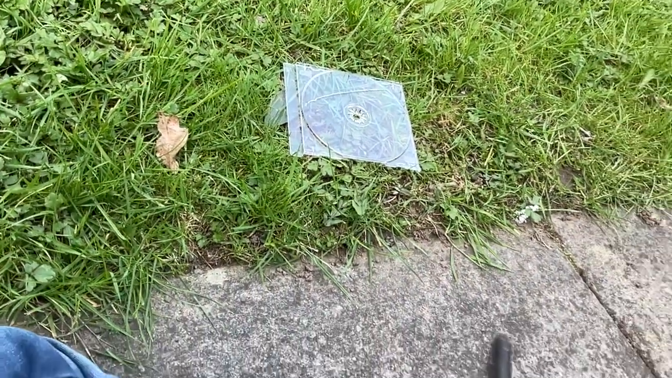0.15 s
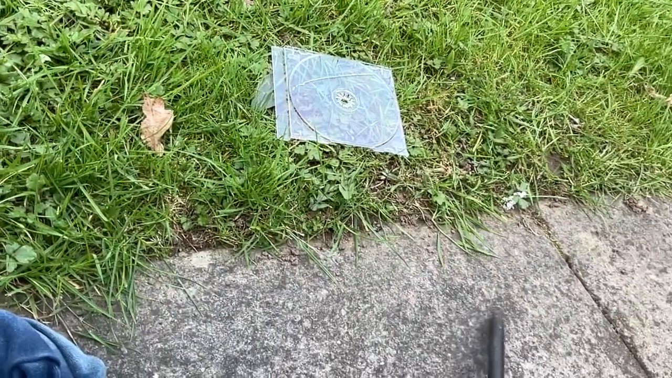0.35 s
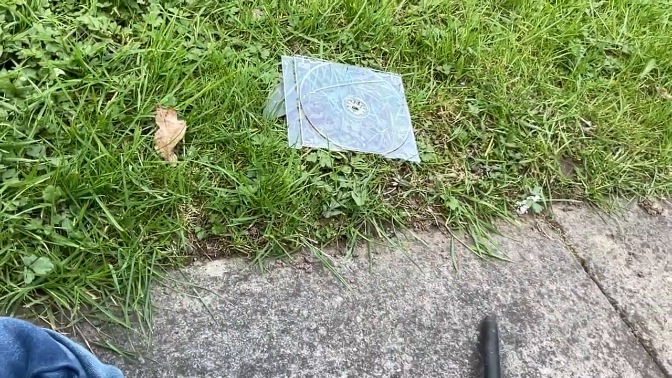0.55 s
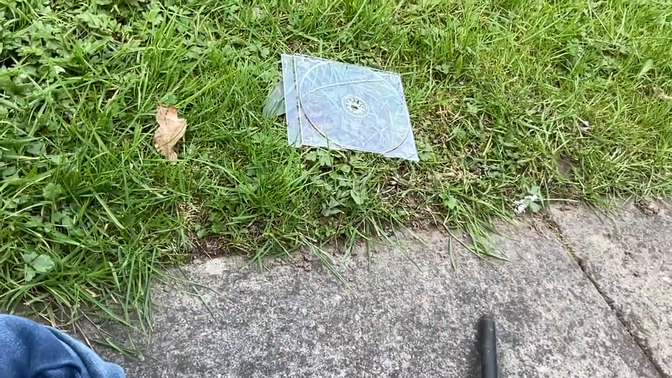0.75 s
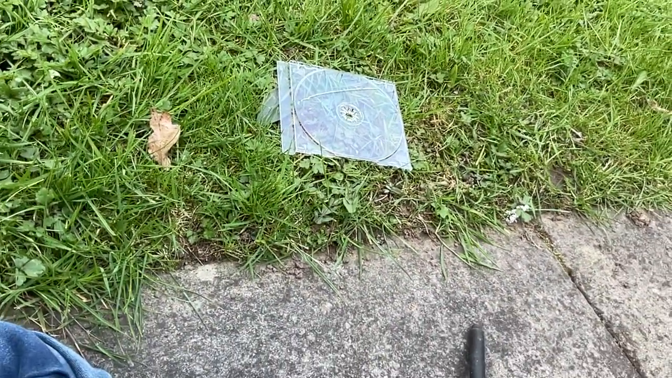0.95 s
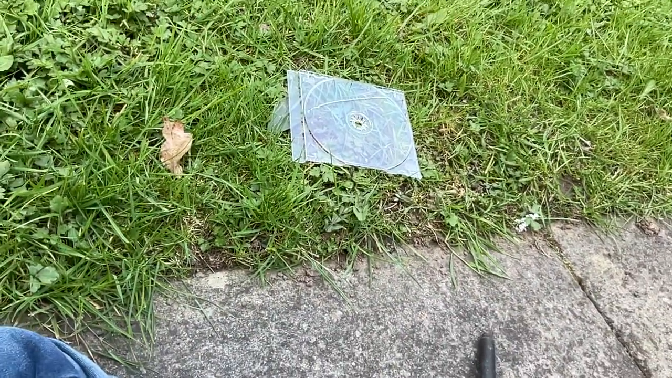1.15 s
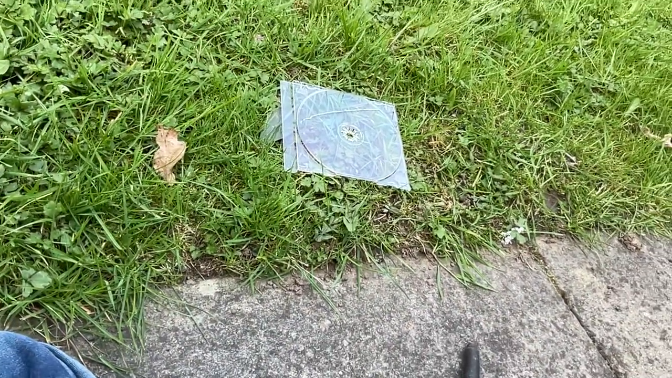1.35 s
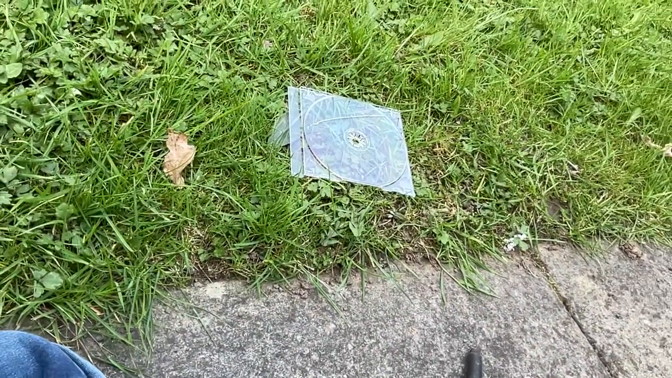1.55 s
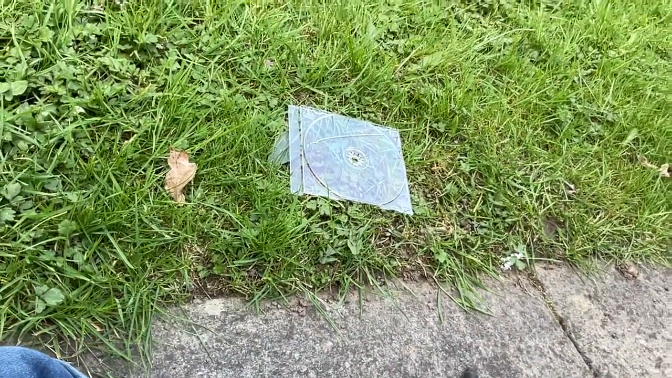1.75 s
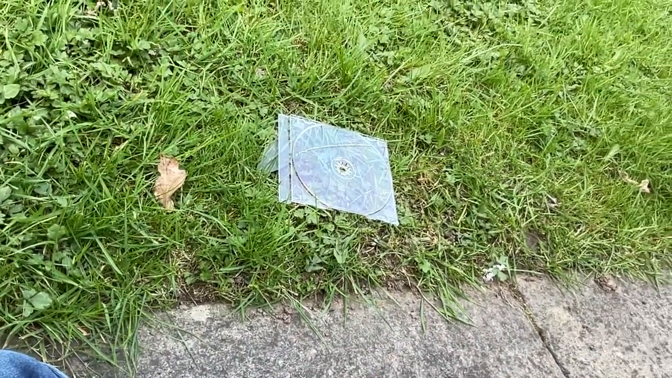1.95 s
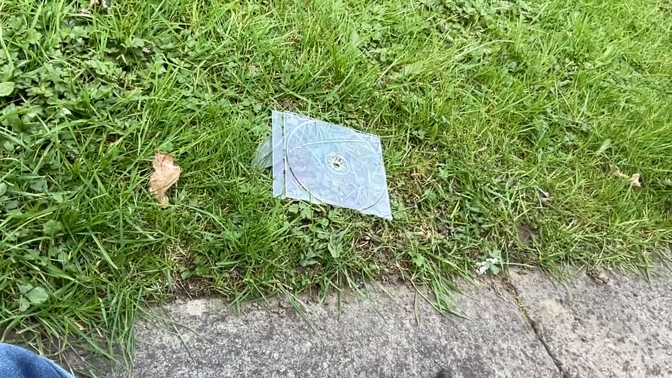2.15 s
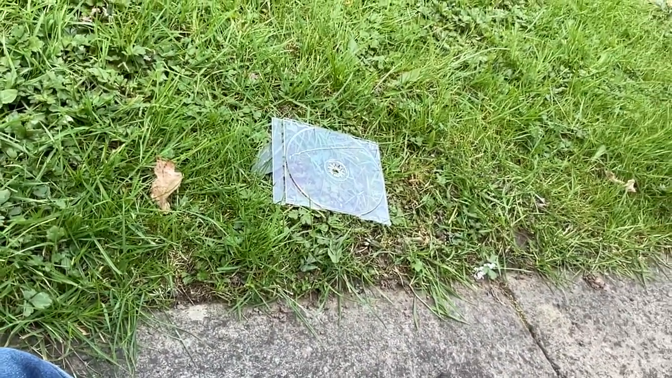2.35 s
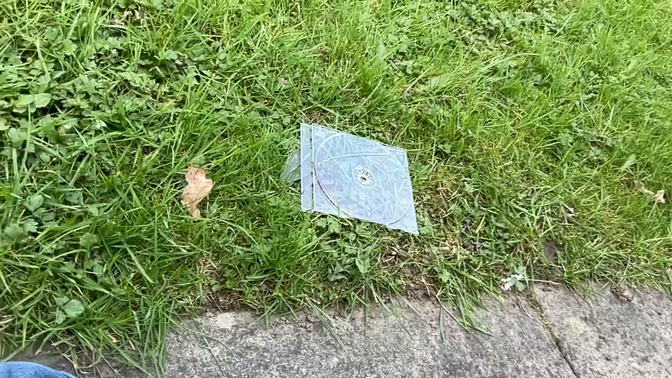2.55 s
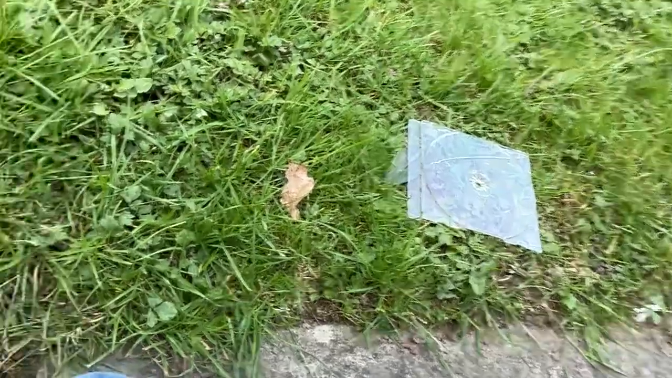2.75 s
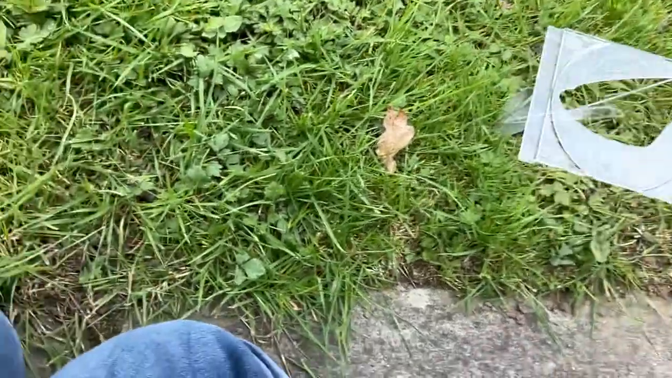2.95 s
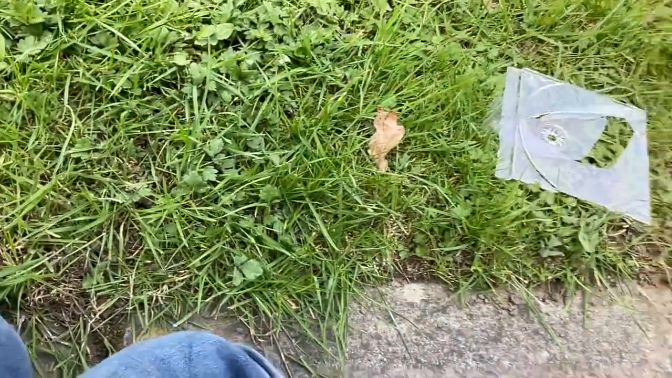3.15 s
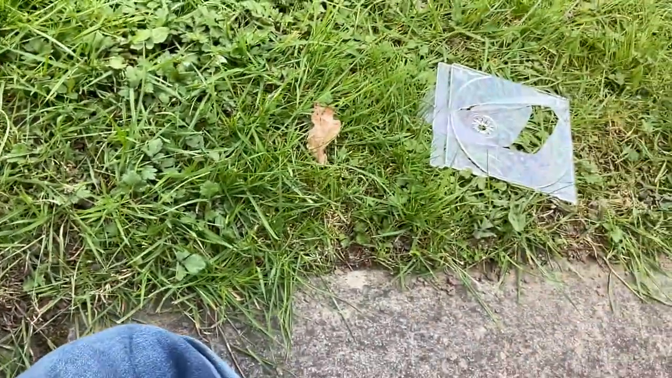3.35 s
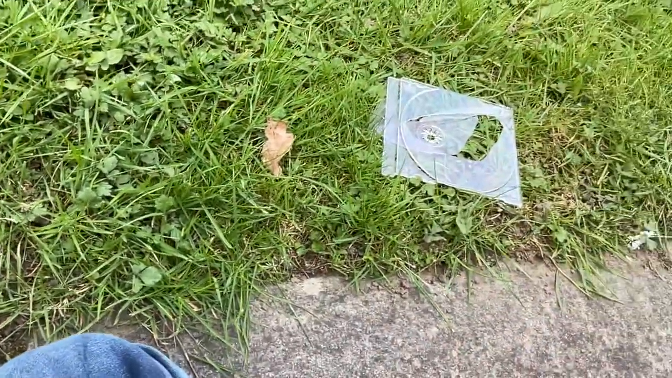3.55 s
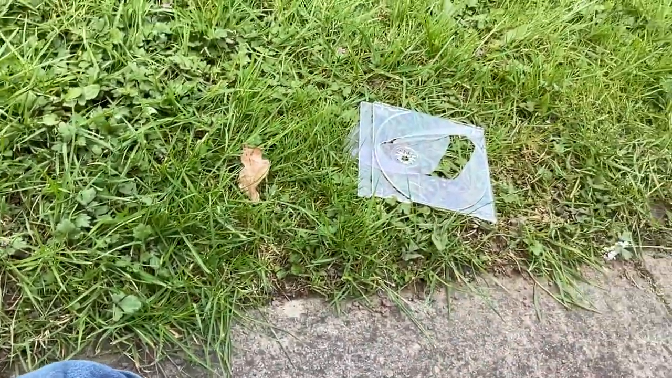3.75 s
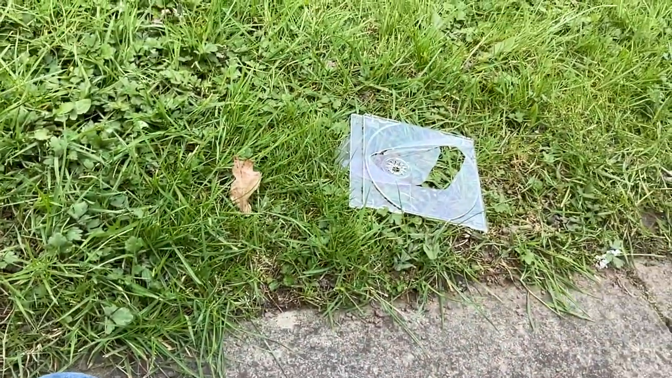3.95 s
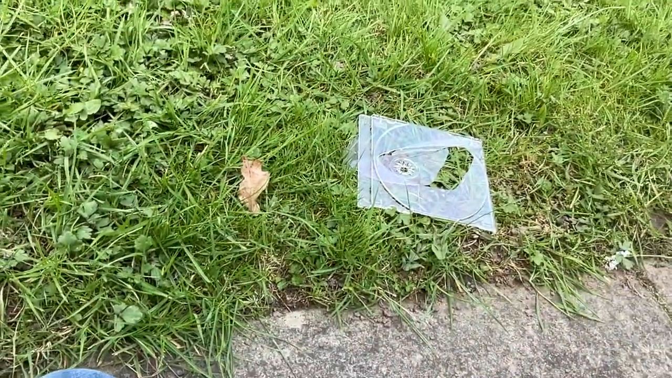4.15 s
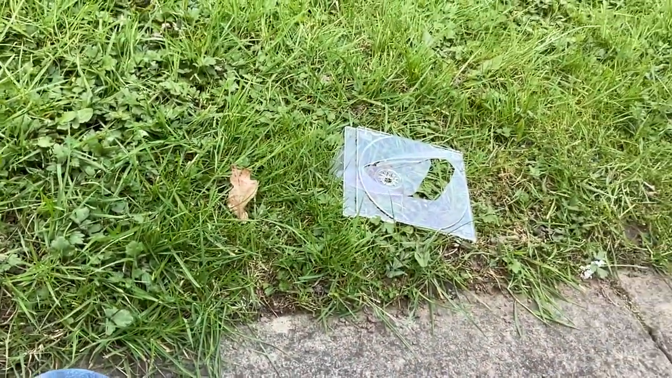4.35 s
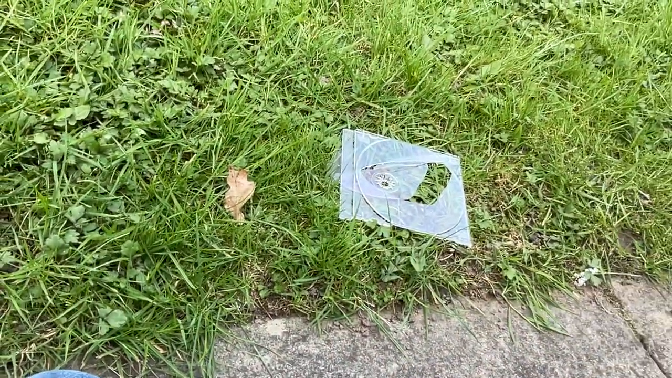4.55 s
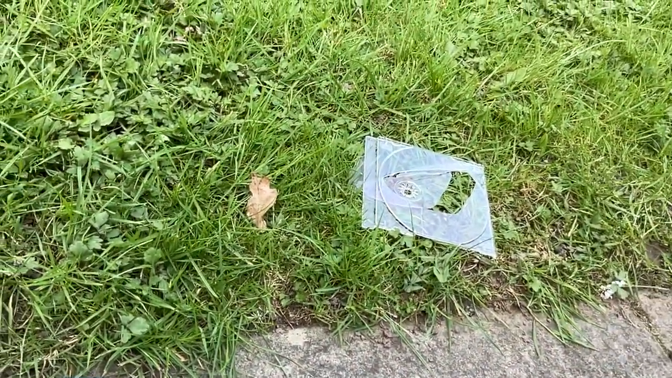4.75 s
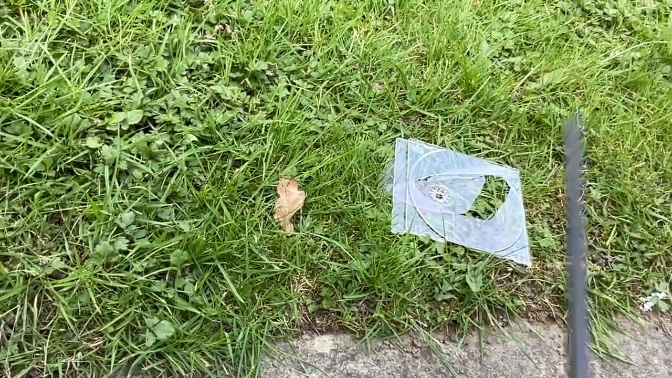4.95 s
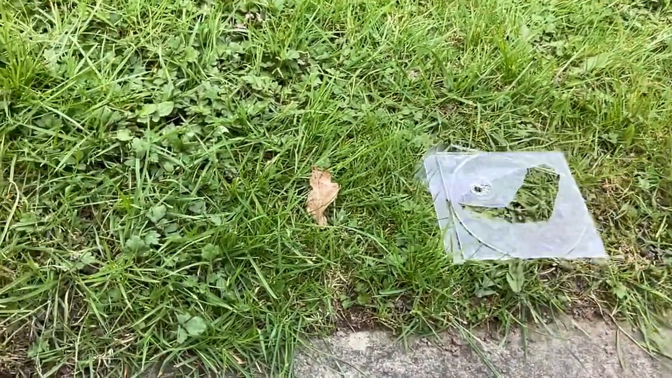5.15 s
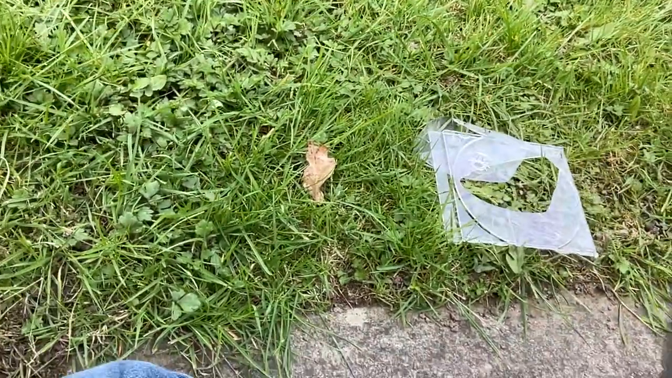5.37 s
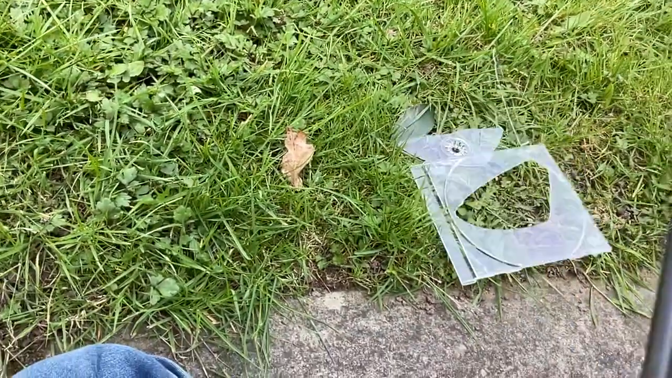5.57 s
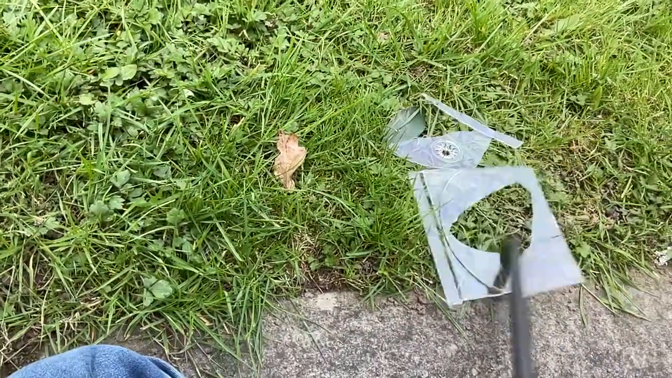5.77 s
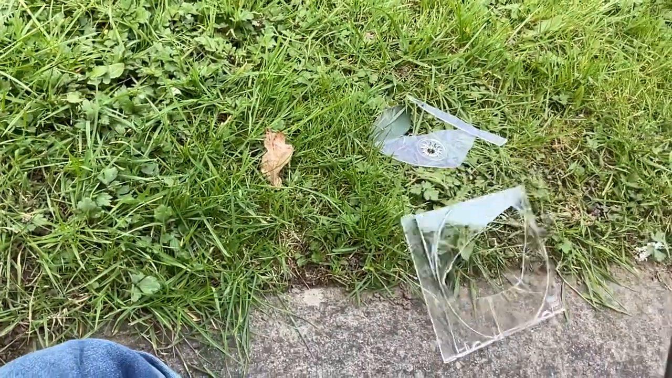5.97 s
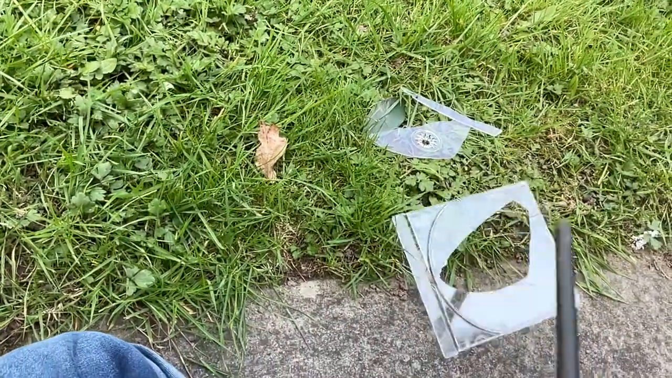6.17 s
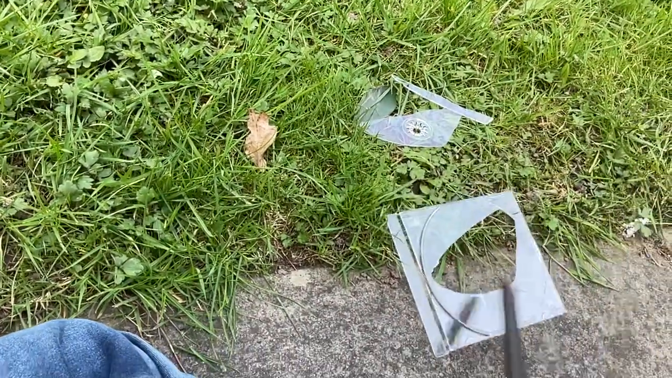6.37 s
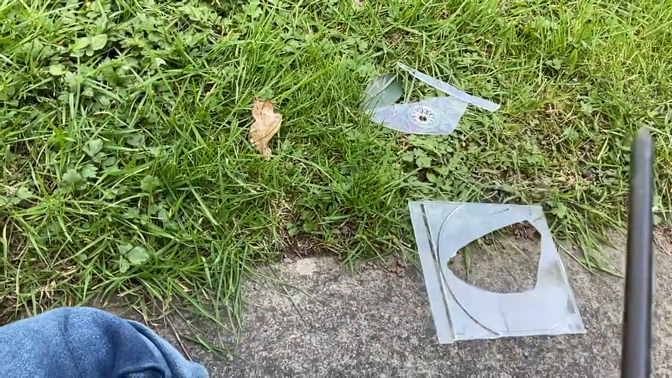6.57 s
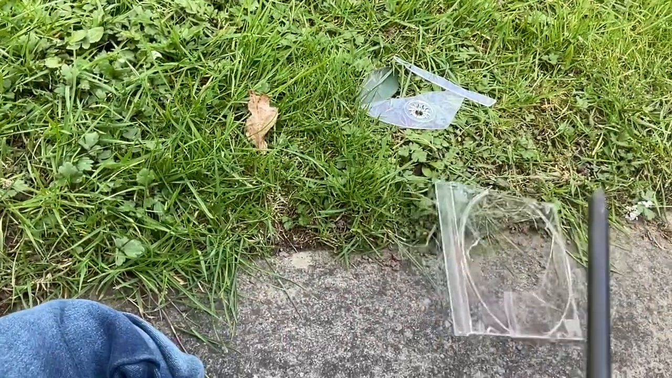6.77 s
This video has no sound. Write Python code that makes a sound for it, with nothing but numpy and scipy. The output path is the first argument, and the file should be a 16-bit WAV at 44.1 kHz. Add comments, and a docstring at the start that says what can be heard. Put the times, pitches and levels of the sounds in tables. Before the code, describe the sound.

A quiet garden beside paving, with distant traffic, low drones and faint bird whistles. Close up, small metallic ticks give way to a loud splitting smash of hard plastic and skittering pieces. A single ringing rod clink sounds in the pause. Then six more blows come faster and faster, brittle and bright, with overlapping rattles, short outdoor echoes and the background dipping under the loudest hits.

```python
"""A garden lawn beside concrete paving: close to the microphone a thin metal rod smashes a clear plastic case.
The rod, a set of dying sines, clinks in the hand, then swishes down seven times: a steady-pitched whistle
in noise, swelling up to the hit. The case splits in bursts of filtered noise, its modes ring, and pieces
tumble with weakening contacts. Around it are garden echoes; far off, filtered-noise traffic, sine drones and
gliding bird whistles. A peak limiter ducks the loudest moments and recovers gradually."""
import sys
import numpy as np
from scipy import signal
from scipy.io import wavfile
from scipy.ndimage import uniform_filter1d, minimum_filter1d

SR = 44100
rng = np.random.default_rng(int(sys.argv[2]) if len(sys.argv) > 2 else 0)


def generate_wav(sig):
    """Save sig (samples, or channels by samples) to the path in sys.argv[1] as 16-bit PCM at SR."""
    pcm = np.round(np.clip(np.atleast_2d(sig).T, -1, 1) * 32767).astype(np.int16)
    wavfile.write(sys.argv[1], SR, pcm)


N = 300321
T = np.arange(N) / SR  # time through the scene, s
AGE = np.arange(SR // 2) / SR  # time since one event began, s

# Spectrum of broken plastic pieces. Each row: frequency in Hz, relative density in dB per Hz.
SHARD = [(200, -45.5), (600, -23), (1000, -11.5), (1400, -7), (1700, -2.5), (2300, 0.5), (3400, -2.5),
         (4400, 2), (6200, 0.5), (9000, -1.5), (16000, -10)]
# Spectrum of a dull, soft impact on turf. Each row: frequency in Hz, relative density in dB per Hz.
TURF = [(30, -26.5), (110, 1.5), (230, -1), (400, -3), (540, -5.5), (800, -9), (1300, -7.5), (3000, -32.5),
        (16000, -78.5)]


def amp(db):
    """Decibels to gain."""
    return 10 ** (np.asarray(db) / 20)


def evened(x):
    """Scales to rms 1."""
    return x / np.sqrt(np.mean(x ** 2) + 1e-20)


def read(points, hz):
    """Reads a curve on a log-frequency axis."""
    f, value = np.transpose(points)
    return np.interp(np.log(hz + 1), np.log(f + 1), value)


def add(mix, s, sound):
    """Mixes a sound in at time s."""
    part = mix[max(round(s * SR), 0):][:len(sound)]
    part += sound[:len(part)]


def colour(x, points, tilt_db=0, peak_hz=1000, peak_db=0, size=4096):
    """Causal filter of unit energy: a spectrum, a tilt in dB per octave above 1 kHz and one resonance."""
    hz = abs(np.fft.fftfreq(size, 1 / SR)) + 1
    db = read(points, hz) + tilt_db * np.log2(np.maximum(hz, 1000) / 4000)
    db += peak_db / (1 + ((hz - peak_hz) / 170) ** 2)
    # the Hilbert transform of the log gain gives the minimum phase
    response = np.exp(np.conj(signal.hilbert(np.log(amp(db)))))
    taps = np.fft.ifft(response).real[:size // 2]
    return signal.fftconvolve(x, taps / np.linalg.norm(taps))[:len(x)]


def drift(count, rate):
    """Random wander: straight lines between unit-normal values drawn rate times a second."""
    knots = rng.standard_normal(4096)
    return np.interp(np.arange(count) * rate / SR, np.arange(len(knots)), knots)


def ring(modes, size=SR // 2):
    """Modes of a struck body: sines of random phase that start together and die exponentially."""
    t = AGE[:size]
    out = np.zeros(len(t))
    for hz, db, t60 in modes:
        decay = np.exp(-np.log(1000) * t / t60)
        out += amp(db) * decay * np.sin(2 * np.pi * (hz * t + rng.random()))
    return out


def crackle(hold, t60, grain_db):
    """A burst of tiny fractures, uneven in size and clumped, that holds briefly, then dies."""
    unevenness = np.clip(drift(len(AGE), 2200) + 0.75 * drift(len(AGE), 350), -2, 2)
    grains = evened(amp(grain_db * unevenness)) * rng.standard_normal(len(AGE))
    return grains * amp(-60 * np.maximum(AGE - hold, 0) / t60)


def push(hz, rise):
    """A dull thump of a few cycles whose pitch sags towards hz as the contact spreads."""
    u = AGE / rise
    phase = 2 * np.pi * np.cumsum(hz * (1 + np.exp(-2 * u))) / SR
    return u * np.exp(1 - u) * np.sin(phase)


def touches(length, gap, scatter_db, count=16):
    """An uneven run of contacts: rows of delay in s and chance level in dB; the first is on time."""
    late, chance = rng.uniform(-1, 1, count), rng.standard_normal(count)
    late[0] = chance[0] = 0
    delay = gap * (np.arange(count) + 0.27 * late)  # early or late by up to 27 % of the gap
    return np.transpose([delay, scatter_db * chance])[delay <= length]


def swells(rows, rest_db):
    """Gain of bell-shaped swells, added as powers to a resting level."""
    power = amp(rest_db) ** 2
    for s, half, db in rows:
        power = power + (amp(db) * np.exp(-((T - s) / half) ** 2)) ** 2
    return np.sqrt(power)


def background():
    """Far traffic and rustling as filtered noise, two engine drones as phase-wavering sines."""
    # Far traffic's spectrum. Each row: frequency in Hz, relative density in dB per Hz.
    traffic_spectrum = [(20, -31.5), (40, -18.5), (65, -1.5), (90, 1), (150, -5), (220, -4), (400, -11.5),
                        (600, -9), (1000, -10), (1400, -17.5), (1900, -26.5), (2500, -49), (4000, -55.5),
                        (16000, -76)]
    # Level of the far traffic bed, nearly steady, ducked by the recorder's gain control around 5.4 s.
    # Each row: time in seconds, level in dB.
    traffic_level = [(0, -55), (4.0, -55.5), (4.9, -56), (5.4, -64), (6.81, -57)]
    # Spectrum of grass and clothing. Each row: frequency in Hz, relative density in dB per Hz.
    rustle_spectrum = [(1180, -25.5), (2000, -4), (3400, -15), (4860, -12), (7120, -20.5), (8930, -17.5),
                       (11000, -27), (13400, -22), (16000, -39.5)]
    # Rustles with each movement. Each row: time of the height in seconds, half-length in seconds, level in dB.
    rustle_rows = [(.1, 0.37, -70), (2.65, .3, -65), (4.5, .45, -66), (5.72, .15, -64.5), (6.6, .5, -54.5)]
    # Swells of the higher distant drone. Each row: time of the height in seconds, half-length in seconds, dB.
    upper_rows = [(.99, .55, -45), (2.33, .35, -51.5), (3.05, .2, -58), (3.97, .3, -53)]
    # Swells of the lower distant drone. Each row: time of the height in seconds, half-length in seconds, dB.
    lower_rows = [(.05, 0.17, -57), (4.0, .25, -58), (4.82, 0.29, -51), (5.8, 0.53, -55)]
    upper_hz, lower_hz, drone_rest_db = 123.2, 102.6, -73
    rustle_rest_db = -77  # the grass when nothing moves

    traffic_db = np.interp(T, *np.transpose(traffic_level)) + 0.9 * drift(N, 8)
    traffic = colour(rng.standard_normal(N), traffic_spectrum) * amp(traffic_db)
    rustle = colour(rng.standard_normal(N), rustle_spectrum) * swells(rustle_rows, rustle_rest_db)
    rustle *= amp(1.2 * drift(N, 29))
    upper = 2 * np.pi * upper_hz * T + 0.23 * drift(N, 1.4)
    lower = 2 * np.pi * lower_hz * T + 0.3 * drift(N, 4)
    drones = swells(upper_rows, drone_rest_db) * (np.sin(upper) + amp(-19.0) * np.sin(2 * upper))
    drones += swells(lower_rows, drone_rest_db) * np.sin(lower)
    return traffic + rustle + np.sqrt(2) * drones  # root 2 makes the drone levels rms


def bird():
    """A thin, unsteady whistle that slides down, and lower arched calls of another bird farther off."""
    # Thin whistle. Each row: seconds from its start, pitch in Hz, level in dB.
    whistle = [(0, 7900, -113), (.13, 8050, -72), (.25, 7800, -80), (0.339, 6800, -66.5),
               (.43, 6340, -72.5), (0.482, 6000, -82.5)]
    # Starts of the whistle, in seconds.
    whistle_starts = [0.12, 4.52]
    # Far bird. Each row: start in seconds, length in seconds, top pitch in Hz, relative level in dB.
    far_calls = [(.05, 0.27, 1476, -54.5), (4.809, 0.19, 1434, -62), (5.549, 0.176, 1420, -61)]
    out = np.zeros(N)
    s, hz, db = np.transpose(whistle)
    for start in whistle_starts:
        pitch = np.interp(AGE, s, hz) * (1 + .04 * drift(len(AGE), 630))
        add(out, start, amp(np.interp(AGE, s, db)) * np.sin(2 * np.pi * np.cumsum(pitch) / SR))
    for start, length, top_hz, call_db in far_calls:
        arch = np.sin(np.linspace(0, np.pi, round(length * SR)))
        pitch = top_hz * (1 - 0.0715 * (1 - arch) + 0.022 * drift(len(arch), 220))
        level = amp(call_db - 1.5 + 4 * drift(len(arch), 28)) * arch
        add(out, start, level * np.sin(2 * np.pi * np.cumsum(pitch) / SR))
    return out


def clink(db, push_db, tilt_db, free):
    """Contact rings the rod's bending modes: sharp favours high ones, hard lasts longer, a tight hand damps."""
    # Bending modes of the rod. Each row: frequency in Hz, relative level in dB, t60 in seconds ringing free.
    rod = [(1174, -23, .07), (2262, 0, .05), (2340, -11, .05), (3677, 2.5, .032), (3978, -6, .017),
           (5367, -3, .055), (7190, -7, .028), (7320, -7, .046), (9480, -13, .032), (11780, -18, .035),
           (14310, -18, .025)]
    # The rod's contact snap. Each row: frequency in Hz, relative density in dB per Hz.
    contact_spectrum = [(100, -34), (500, -20.5), (1200, -12.5), (1500, -13), (2000, -8), (3500, -2.5),
                        (5000, -13.5), (6100, -9.5), (8000, -16.5), (11000, -20), (16000, -35.5)]
    modes = ring([(hz, level + tilt_db * np.log2(hz / 4500), t60 * free) for hz, level, t60 in rod])
    contact_s = 0.0012 + 0.0031 * amp(db)  # harder contacts squash for longer
    contact = colour(crackle(contact_s, .011, grain_db=0), contact_spectrum, tilt_db / 2)
    hand = push(260, rise=0.0016) + amp(-2) * colour(crackle(0.0016, 0.051, grain_db=1.5), TURF)
    ringing = amp(-4 + .15 * db) * modes
    return amp(db) * (ringing + amp(-7.5) * contact + amp(push_db) * hand)


def clinks():
    """The rod chatters in growing touches as it shifts in the hand, and clinks now and then."""
    # Single clinks. Each row: time in seconds, relative level in dB, dull push of the hand in dB
    # relative to the clink, treble tilt in dB per octave.
    single_clinks = [(0.16, -33.5, -31, 1.5), (.2302, -26.5, -22.5, -0.5), (0.3981, -25.5, -14, -5),
                     (0.4571, -24.5, -23, -5), (0.4704, -39, -25, 10), (2.423, -44.5, -16.5, -12),
                     (3.5976, -1.5, -24.5, 0), (3.769, -21, -16, -1.5), (3.802, -36, -13, -12),
                     (4.12, -50.5, -19, 1)]
    # Chatter in the hand. Each row: start in seconds, length in seconds, relative level of first touch in dB.
    chatter_rows = [(0.116, .105, -48.5), (1.698, .02, -62.5), (2.391, .045, -53.5)]
    # How freely the hand lets the rod ring. Each row: time in seconds, factor on the rod's t60.
    grip = [(.4, 0.5), (2.5, .8)]
    gap_s, scatter_db, rise_db_per_s = 0.008, 1, 109
    push_db, tilt_db = -20.5, 3.5  # light touches: little push, much treble
    chatter = []
    for s, length, db in chatter_rows:
        for delay, chance_db in touches(length, gap_s, scatter_db):
            chatter.append((s + delay, db + rise_db_per_s * delay + chance_db, push_db, tilt_db))
    out = np.zeros(N)
    for s, db, hand_db, treble_db in chatter + single_clinks:
        add(out, s, clink(db, hand_db, treble_db, free=np.interp(s, *np.transpose(grip))))
    return out


def handling():
    """Dry noise clicks with a hollow ringing note from the grip, and soft bumps of the body moving."""
    # Light knocks of the rod's grip. Each row: time in seconds, click in dB, hollow note in dB.
    knocks = [(1.745, -96, -49.5), (1.851, -92, -50.5), (2.572, -40.5, -50), (2.63, -34, -34),
              (3.215, -59, -46), (3.304, -56.5, -83), (4.388, -38, -34.5), (4.614, -36.5, -60)]
    # Soft bumps of the body. Each row: time in seconds, level in dB, pitch it sags towards in Hz.
    bumps = [(2.785, -41, 148), (2.807, -33, 156), (2.989, -31, 141), (3.013, -34, 70.5), (3.034, -33, 70)]
    # Spectrum of a dry click. Each row: frequency in Hz, relative density in dB per Hz.
    tick = [(40, -20.5), (300, -5.5), (1200, -2.5), (3500, 9), (6000, -3), (11000, -8.5), (16000, -13.5)]
    out = np.zeros(N)
    for s, click_db, note_db in knocks:
        add(out, s, amp(click_db) * colour(crackle(0.00057, 0.012, grain_db=0), tick))
        note = ring([(480, 5.5, 0.038), (597.3, -5.5, 0.035), (826, -8, .03)])
        add(out, s + 0.0011, amp(note_db) * note)
    for s, db, hz in bumps:
        add(out, s, amp(db) * push(hz, rise=0.0023))
    return out


def fragment(x, ring_t60, scatter_db, count):
    """A broken piece rings in many close modes, different with every break; high ones die sooner."""
    draws = rng.random((count, 3))
    hz = 1000 * 16 ** (((np.arange(count) + draws[:, 0]) / count) ** .7)  # 1 to 16 kHz
    db = read(SHARD, hz) + 3 * np.log2(hz / 1000) + scatter_db * draws[:, 1]
    t60 = ring_t60 * (.5 + draws[:, 2]) * (3000 / hz) ** 0.96
    body = ring(np.transpose([hz, db, t60]), size=round(ring_t60 * SR))
    return signal.fftconvolve(x, body / np.linalg.norm(body))[:len(x)]


def case_ring(x, modes_db):
    """The shell's own low modes answer every shock; the lowest last longest."""
    # Strongest notes of the shell. Each row: frequency in Hz, relative level in dB.
    shell_notes = [(815, -11), (1130, -9), (1280, -7), (1600, -5), (1740, -7), (1970, -2), (2110, -3),
                   (2230, -2), (2440, -3), (2510, -2), (2727, -6), (3306, -5), (4336, -5), (4873, -5)]
    body = ring([(hz, db, .22 * np.sqrt(2000 / hz)) for hz, db in shell_notes])
    return amp(modes_db) * signal.fftconvolve(x, body / np.linalg.norm(body))[:N]


def blows():
    """The rod whistles down, splits the plastic in a noise burst and thuds into the ground beneath."""
    # Blows on the case. Each row: time in seconds, crack level in dB, time of splitting in seconds,
    # decay t60 in seconds, treble tilt in dB per octave, note of the struck panel in Hz,
    # relative thud level in dB, pitch the thud sags towards in Hz.
    blow_rows = [(2.834, 1, 0.0097, .026, -2, 1620, -14, 175),
                 (4.985, -4, 0.0042, 0.015, -1, 1560, -29.5, 120),
                 (5.421, -9, 0.0054, 0.045, -2, 2210, -32.5, 236),
                 (5.780, -6.5, 0.014, 0.035, -1.5, 2400, -35.5, 187),
                 (6.092, -0.5, 0.0074, 0.032, -.5, 5200, -33, 194),
                 (6.3896, -6, 0.004, 0.11, -1, 4540, -34.5, 212),
                 (6.652, 0.5, 0.0061, 0.07, -0.5, 4900, -34.5, 291)]
    # Spectrum of splitting plastic. Each row: frequency in Hz, relative density in dB per Hz.
    crack_spectrum = [(100, -47), (480, -40.5), (800, -15), (1050, -21.5), (1600, -8.5), (2400, -3.5),
                      (3400, -5), (5100, 2.5), (7000, -1.5), (10000, -3), (13000, -5.5), (16000, -8)]
    out, shaking = np.zeros((2, N))
    lead = AGE[:SR // 20]  # the swing before contact
    for s, db, hold, t60, tilt_db, panel_hz, thud_db, thud_hz in blow_rows:
        burst = crackle(hold, t60, grain_db=4.5)
        crack = amp(db) * colour(burst, crack_spectrum, tilt_db, panel_hz, peak_db=4.5)
        add(out, s, crack + amp(-14.5) * fragment(crack, ring_t60=0.13, scatter_db=6.5, count=200))
        add(shaking, s, crack)
        # the turf gives way: a thump inside a dull crunch that grows with the depth of the blow
        crunch = colour(crackle(0.0032, 0.045, grain_db=0.5), TURF)
        thump = amp(-4.5) * push(thud_hz, rise=0.0055)
        add(out, s + .002, amp(thud_db) * (thump + amp(4 + 0.15 * thud_db) * crunch))
        # a faster swing both whistles louder and drives deeper, so the swish follows the thud level
        whistle = np.sin(2 * np.pi * 1720 * lead + drift(len(lead), 120))
        air = amp(2.5) * colour(rng.standard_normal(len(lead)), crack_spectrum)
        swish_db = thud_db - 13.5 - 60 * lead[::-1] / 0.049  # swells up to the hit
        add(out, s - lead[-1], (whistle + air) * amp(swish_db))
    return out + case_ring(shaking, modes_db=-16.5)


def rattles():
    """The case and its splinters land and tumble on, contacts tending weaker and duller as they go."""
    # Landings. Each row: time in seconds, relative level of the landing in dB, length of the tumble in
    # seconds (0 for a single contact), decay t60 of a contact in seconds.
    tumbles = [(2.8684, -4, .07, 0.096), (2.967, -18.5, .07, .14), (3.0538, -7, 0, 0.12),
               (3.0705, -6, 0, 0.049), (3.1258, -23, .03, 0.051), (5.0072, -7, 0, 0.14),
               (5.064, -14, .05, 0.093), (5.1519, -22.5, 0, 0.055), (5.1727, -21, .1, 0.069),
               (5.1879, -10, 0, 0.031), (5.4624, -16.5, .05, 0.06), (5.526, -22.5, 0, 0.041),
               (5.5512, -27.5, 0, 0.055), (5.6112, -38, .07, 0.036), (5.8324, -13, .045, 0.11),
               (5.923, -17, 0, .085), (5.954, -21, .05, 0.16), (6.1436, -16.5, .03, 0.19),
               (6.235, -17.5, 0, 0.3), (6.2444, -15, .07, 0.048), (6.4222, -12.5, .095, 0.11),
               (6.5291, -20, 0, 0.12), (6.542, -19.5, .03, .11), (6.6184, -30.5, 0, 0.097),
               (6.6687, 2, 0, 0.032), (6.7719, -16.5, 0, 0.046), (6.784, -8.5, .03, 0.031)]
    bounce_s, loss_db_per_s, scatter_db = .02, 152, 1
    out = np.zeros(N)
    for s, landing_db, length, t60 in tumbles:
        for delay, chance_db in touches(length, bounce_s, scatter_db):
            db = landing_db - loss_db_per_s * delay + chance_db
            tilt_db = 3 + 0.2669 * db  # per octave; softer contacts are duller
            snap = amp(db - 13.0) * colour(crackle(0.0014, t60, grain_db=3), SHARD, tilt_db)
            piece = fragment(snap, ring_t60=0.065, scatter_db=20.0, count=45)
            add(out, s + delay, snap + amp(-3.0) * piece)
    return out + case_ring(out, modes_db=-21.5)


def garden(x, wet_db, near_db):
    """Quick returns from the paving and the body, then scattered ones from fences and walls."""
    # Decay of the garden's echoes. Each row: frequency in Hz, t60 in seconds.
    echo_decay = [(200, .2), (1000, 0.92), (2200, 0.35), (5000, 0.15), (9000, 0.79), (16000, .27)]
    taps = rng.standard_normal(len(AGE)) * (rng.random(len(AGE)) < .06)
    hz, t, z = signal.stft(taps, SR, nperseg=256)
    fade = amp(-60 * t / read(echo_decay, hz)[:, None]) * np.minimum(t / .02, 1)
    tail = signal.istft(z * fade, SR, nperseg=256)[1]
    tail *= amp(wet_db) / np.linalg.norm(tail)
    early = taps * (AGE > .008) * amp(-60 * AGE / 0.15)
    add(tail, 0, amp(near_db) * early / np.linalg.norm(early))
    return signal.fftconvolve(x, tail)[:N]


def scene():
    """Near sounds with their echoes over the garden's background."""
    near = clinks() + handling() + blows() + rattles()
    return (background() + bird() + near + garden(near, wet_db=-40.5, near_db=-22.5))[None]


def record(dry, threshold_db=-0.5, recovery_db=50):
    """Bass cut, peak limiter recovering at a steady rate in dB per second, rounded peaks, then a treble limit."""
    x = signal.sosfilt(signal.butter(2, 45, "highpass", fs=SR, output="sos"), dry)
    peak = -minimum_filter1d(-abs(x[0]), size=90)
    peak_db = 20 * np.log10(1e-6 + peak)
    fall = T * recovery_db
    held_db = np.maximum.accumulate(peak_db + fall) - fall  # leaps up, falls steadily
    over_db = np.maximum(held_db - threshold_db, 0)
    ducked = x / amp(0.76 * uniform_filter1d(over_db, 90))  # takes off 76 % of the excess dB
    rounded = .88 * np.tanh(ducked / .88)
    lowpass = signal.firwin(255, 16200, window=("kaiser", 8), fs=SR)
    return signal.oaconvolve(rounded, lowpass[None], "same")


dry = scene()
out = record(dry)
generate_wav(out)
```